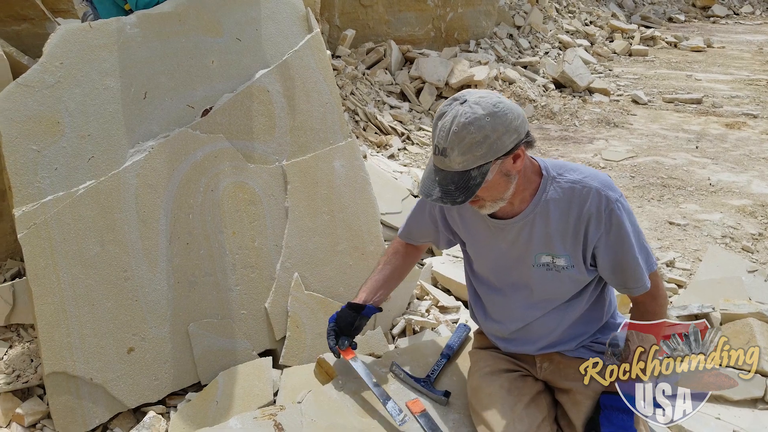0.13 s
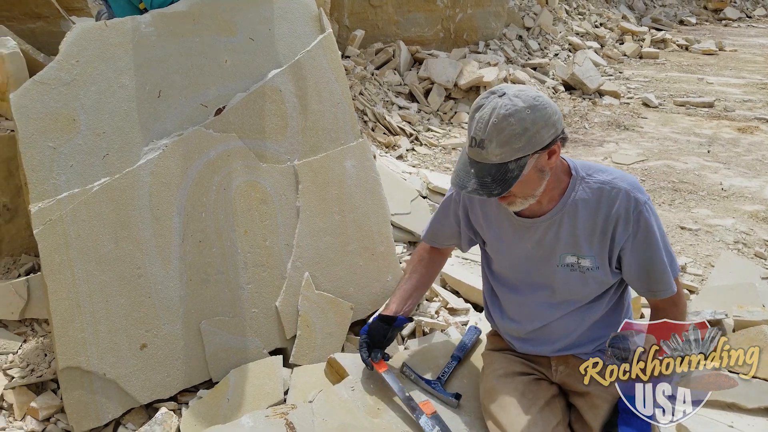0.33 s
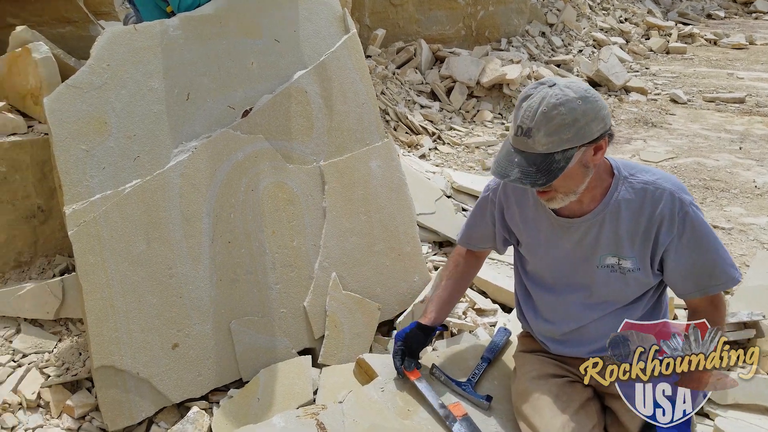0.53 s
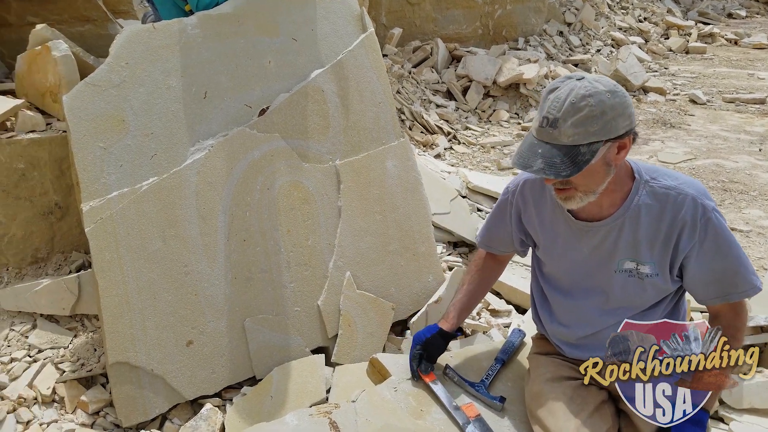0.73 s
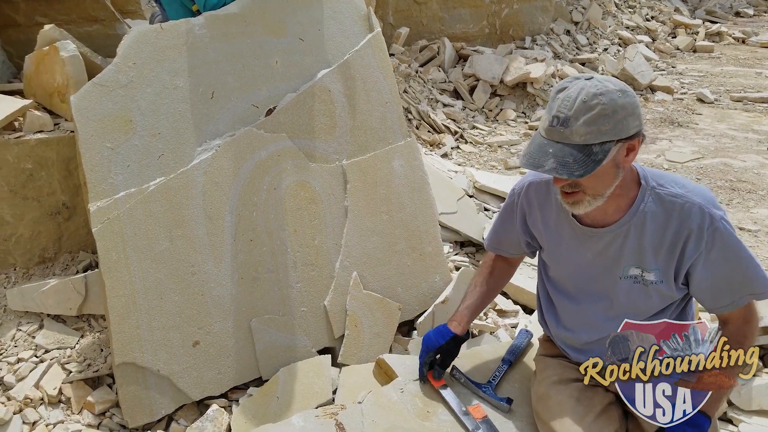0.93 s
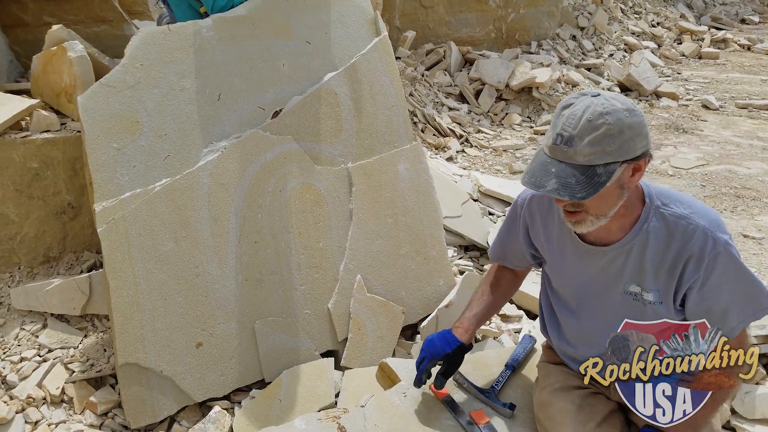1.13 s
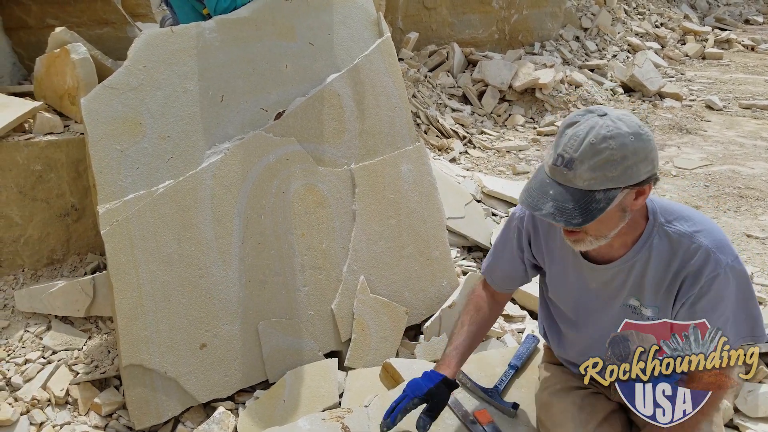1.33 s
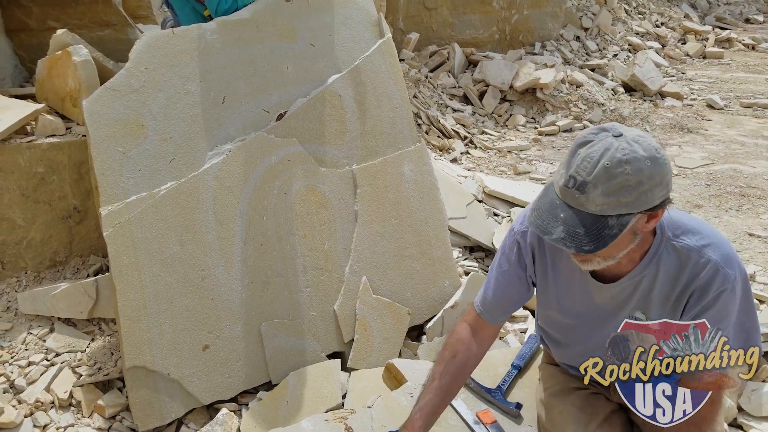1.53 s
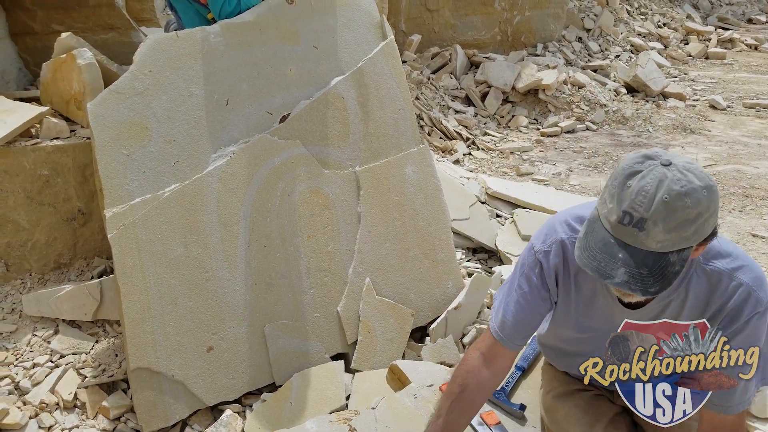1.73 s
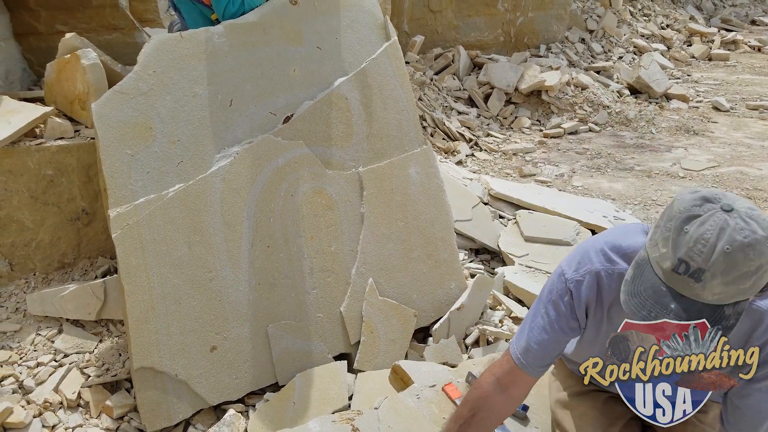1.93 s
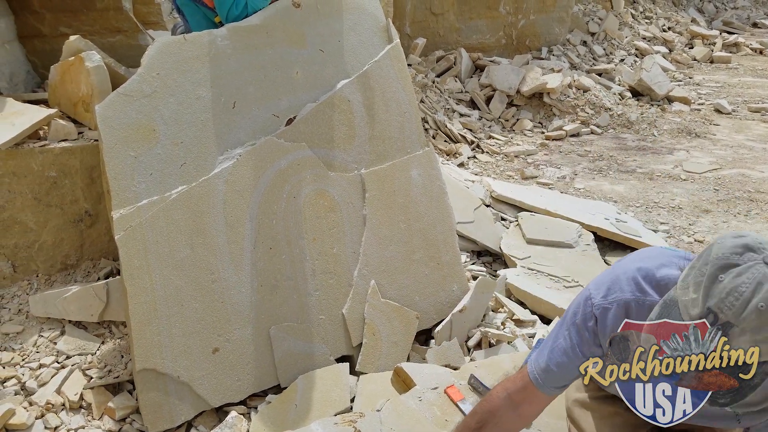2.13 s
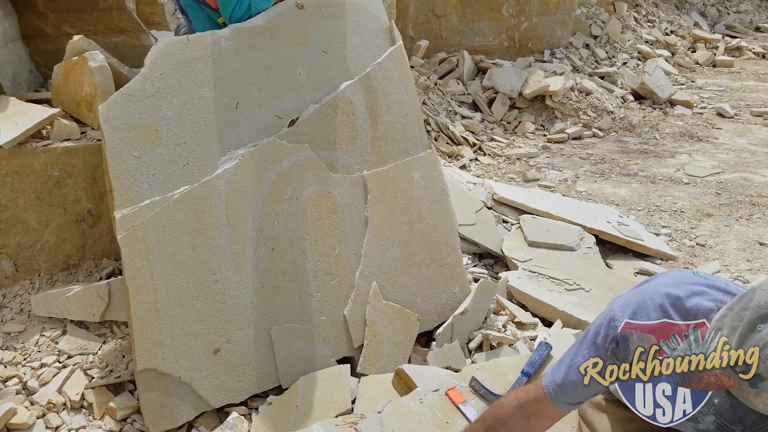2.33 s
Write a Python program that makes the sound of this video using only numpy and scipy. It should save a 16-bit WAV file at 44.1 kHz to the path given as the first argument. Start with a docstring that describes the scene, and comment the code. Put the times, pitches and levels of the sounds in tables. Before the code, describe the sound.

A steel blade taps stone in a quick bright cluster at 0.4 s with a grit scuff, creaks in fine ticks from 0.5 to 0.7, drags with a faint hiss from 0.8, and drops flat, chattering around 1.0 with a short rubble echo. Clothes rustle softly, clearest 1.4-2.0; grit scuffs at 2.3. Low wind thumps, flutters and pops on the microphone over a faint distant drone.

```python
"""Wind buffets each microphone port in turn throughout, with pops and flutter, over a faint far-off drone.
A steel blade's tip clinks on stone slabs in an open quarry (decaying modes) and grit scuffs (noise bursts).
The blade creaks in stick-slip ticks, its tip drags with a hiss, then it drops flat and chatters.
Clothes rustle as the worker leans over, most clearly afterwards (swells of banded noise), and grit scuffs
again near the end. Rubble returns a short diffuse echo of the blade."""
import sys
import numpy as np
from scipy import signal
from scipy.fft import rfft, irfft, next_fast_len
from scipy.io import wavfile
from scipy.ndimage import uniform_filter1d, map_coordinates

SR = 44100
rng = np.random.default_rng(int(sys.argv[2]) if len(sys.argv) > 2 else 0)


def transcribe(u):
    """Save the signal u as a 16-bit wav file named by the first command-line argument.

    u: samples, shape (n,) or (channels, n), limited to [-1, 1]; the rate is SR.
    q: integer samples, one column per channel.
    """
    v = np.clip(np.atleast_2d(u).T, -1, 1)
    q = np.round(v * 32767).astype(np.int16)
    wavfile.write(sys.argv[1], SR, q)


N = 105178  # length in samples

# the blade's modes: (frequency [Hz], level struck at the tip [dB], level landing flat [dB], t60 [s])
BLADE = [(2108, -21, -3, .11), (2192, -18, -4, .15), (2423, -19, 1, .1), (2525, -19, 2, .1),
         (2591, -18, -3, .09), (3419, 1, -1, .1), (3530, -9, -8, .08), (4060, -5, -6, .13),
         (5057, -7, 2, .1), (5097, 3, -8, .11), (5241, -5, -4, .06), (5935, -4, -4, .1),
         (6264, -15, -3, .11), (7020, -3, -3, .09), (7190, -1, -15, .08), (8166, -8, -17, .11),
         (8866, 2, -6, .08), (9271, -15, -12, .1), (11000, -4, -11, .08), (11740, -17, -11, .11),
         (12565, -9, -21, .06), (13500, -10, -15, .07)]
# colour of steel cracking or grating on stone: (frequency [Hz], level [dB])
CRACK = [(300, 2), (1000, -8.5), (1450, -11), (2500, 0.5), (3600, 3), (5400, 6.5), (7300, 6.5), (9800, -8),
         (13500, -5), (16000, -14)]
ATTACK_S = .0005  # time constant of every sudden start


def amp(db):
    """Decibels to gain."""
    return 10 ** (np.asarray(db) / 20)


def unit(x):
    """Scale to rms 1."""
    return x / np.sqrt(np.mean(x ** 2) + 1e-20)


def along(points, hz):
    """Read (frequency, value) points on a log frequency axis."""
    f, v = np.transpose(points)
    return np.interp(np.log(hz + 1), np.log(f + 1), v)


def curves(rows):
    """One value per sample for each column after the time."""
    s, *cols = np.transpose(rows)
    t = np.arange(N) / SR
    return [np.interp(t, s, c) for c in cols]


def wobble(rate):
    """A smooth random curve with rate knots a second."""
    knots = rng.standard_normal(int(N * rate / SR) + 4)
    return map_coordinates(knots, [np.arange(N) * rate / SR])


def filtered(x, response):
    """Shape x in the spectrum by a response of frequency."""
    m = next_fast_len(N + SR // 4)
    spectrum = rfft(x, m) * response(np.fft.rfftfreq(m, 1 / SR))
    return irfft(spectrum, m)[..., :N]


def noise(colour, alike=0):
    """Coloured stereo noise of rms 1; alike is the correlation of its sides."""
    a, b = filtered(rng.standard_normal((2, N)), lambda hz: amp(along(colour, hz)))
    u = np.arccos(np.clip(alike, -1, 1)) / 2
    left = np.cos(u) * a + np.sin(u) * b
    right = np.cos(u) * a - np.sin(u) * b
    return unit(np.array([left, right]))


def swell(s, rise, fall):
    """A bell-shaped envelope peaking at s, with its own width on each side."""
    t = np.arange(N) / SR - s
    return np.exp(-.5 * (t / np.where(t < 0, rise, fall)) ** 2)


def burst(s, t60):
    """A sudden start at s and an exponential decay."""
    t = np.maximum(np.arange(N) / SR - s, 0)
    return (1 - np.exp(-t / ATTACK_S)) * np.exp(-np.log(1000) * t / t60)


def panned(db):
    """Left and right gains of constant power, db being left minus right."""
    g = amp(np.array([np.atleast_1d(db), -np.atleast_1d(db)]) / 2)
    return g / np.sqrt(np.mean(g ** 2, axis=0))


def add(out, s, sound):
    """Mix a short sound in at time s."""
    part = out[..., int(s * SR):][..., :sound.shape[-1]]
    part += sound[..., :part.shape[-1]]


def shares(db):
    """Gains of a set of modes, scaled to a total energy of 1."""
    return amp(db) / np.linalg.norm(amp(db))


def clinks():
    """Every contact adds energy to the blade's strong and lesser modes, cracks, and knocks the slab."""
    # steel meets stone: (time [s], ring level [dB], flatness [0 tip - 1 flat])
    contacts = [(0.4012, -27.5, 0.6), (.411, -17, 0), (.4185, -21.5, 0), (.429, -27, 0.14),
                (.8897, -41.5, 0), (.9321, -38, 0), (.9661, -27, 0.53), (.9985, -20, 0.81),
                (1.013, -19, 0.84), (1.0175, -19, 0.99), (1.026, -30, 1), (1.037, -29, 1),
                (1.047, -30.5, 0), (1.054, -39, 0.71)]
    # the slab's dull modes: (frequency [Hz], level [dB], t60 [s])
    slab = [(426, -2.5, 0.056), (1443, 0, 0.039), (1766, -2.5, 0.063)]
    slab_db = -16  # relative to the blade's ring
    weak_db, weak_t60_s = -5, .07  # lesser modes, relative to the strong ones
    flat_soft_db, flat_dull_db_per_khz = -6, 1.0  # softening by flatness; treble loss of lesser modes
    crack_db, crack_t60_s = 0, .02
    port_phase_rad = .7  # random phase spread of the modes at each port

    hz, tip, flat, t60 = np.transpose(BLADE)
    weak_hz = np.linspace(1300, 15000, num=70) * (1 + .008 * rng.standard_normal(size=70))
    all_hz = np.r_[hz, weak_hz]
    all_t60 = np.r_[t60, np.full(len(weak_hz), weak_t60_s)]
    poles = 2j * np.pi * all_hz - np.log(1000) / all_t60

    t = np.arange(SR // 3) / SR
    attack = 1 - np.exp(-t / ATTACK_S)
    modes = np.exp(poles[:, None] * t) * attack
    knock = attack * sum(amp(db + slab_db) * np.sin(2 * np.pi * f * t) * np.exp(-np.log(1000) * t / life)
                         for f, db, life in slab)
    ports = np.exp(1j * port_phase_rad * rng.standard_normal((2, len(poles))))

    out, cracks, last_s = np.zeros((2, N)), np.zeros(N), 0
    motion = np.exp(2j * np.pi * rng.random(len(poles))) * 1e-9  # almost at rest
    for s, ring_db, flatness in contacts:
        soft_db = flatness * flat_soft_db
        strong = shares(tip + np.clip(flatness, 0, 1) * (flat - tip))
        weak_colour_db = along(CRACK, weak_hz) - flatness * flat_dull_db_per_khz * weak_hz / 10 ** 3
        weak = amp(weak_db + soft_db) * shares(weak_colour_db)
        # kick a quarter turn off the motion still ringing, so that energies add
        motion = motion * np.exp(poles * (int(s * SR) - int(last_s * SR)) / SR)
        quarter_turn = np.exp(1j * np.angle(motion)) * rng.choice([1j, -1j], size=len(poles))
        kick = amp(ring_db) * np.sqrt(2) * np.r_[strong, weak] * quarter_turn
        motion, last_s = motion + kick, s
        ring = ((kick * ports) @ modes).real
        add(out, s, ring + amp(ring_db + soft_db) * knock)
        cracks += amp(ring_db + crack_db + soft_db) * burst(s, crack_t60_s)
    return out + cracks * noise(CRACK, alike=0.46)


def slide():
    """The dragged tip hisses and keeps the blade faintly singing: noise through the modes' resonances."""
    # how strongly the tip drags: (time [s], level [dB])
    drag = [(.68, -110), (.76, -79), (.82, -58.5), (.88, -55), (.95, -48), (.99, -52), (1.04, -110)]
    grit_db = -8  # grating, relative to the singing

    def steel(f):
        """Sharp resonances at the blade's modes."""
        return sum(amp(tip) / (1 + 1j * (f - hz) / (hz * 0.011)) for hz, tip, flat, t60 in BLADE)

    singing = unit(filtered(rng.standard_normal((2, N)), steel))
    level = amp(curves(drag)[0] + 0.68 * wobble(120))
    return level * (singing + amp(grit_db) * noise(CRACK))


def creaks():
    """The held blade sticks and slips in trains of ticks, each ringing briefly at one pitch."""
    # trains: (start [s], length [s], slip rate [1/s], first level [dB], last level [dB], pitch [Hz])
    trains = [(0.5, .022, 48, -31, -37, 5370), (.551, 0.041, 210, -38.5, -28, 4050),
              (.587, 0.0348, 200, -26, -32, 3780), (0.647, .074, 56, -34.5, -35.5, 3060)]
    # colour of a slip: (multiple of its pitch [ratio], level [dB])
    slip_colour = [(.5, -40), (.8, -14), (1, 5.5), (1.2, -8), (1.5, -0.5), (2.1, -4.5), (2.6, -22),
                   (4, -21)]
    slip_t60_s, ring_t60_s, ring_db = 0.0077, .016, -4  # ring level is relative to the grit
    jitter = .05  # timing scatter, in slip periods
    pan_db = 3.5  # left minus right
    out, t = np.zeros((2, N)), np.arange(N) / SR
    for start, length, rate, first_db, last_db, hz in trains:
        grit = noise([(multiple * hz, db) for multiple, db in slip_colour], alike=0.23)
        for age in np.arange(0, length, 1 / rate):
            s = start + age + jitter * rng.standard_normal() / rate
            ring = amp(ring_db) * burst(s, ring_t60_s) * np.sin(2 * np.pi * hz * (t - s))
            level_db = first_db + (last_db - first_db) * age / length
            out += amp(level_db) * (burst(s, slip_t60_s) * grit + ring)
    return out * panned(pan_db)


def rocks(x):
    """The rubble's short diffuse echo: x convolved with noise that decays at its own rate in each band."""
    # echo decay: (frequency [Hz], t60 [s])
    decay = [(500, 0.15), (2200, 0.24), (6000, 0.15), (14000, 0.13)]
    hz, t, z = signal.stft(rng.standard_normal((2, SR // 2)), SR, nperseg=256)
    fading = np.exp(-np.log(1000) * t / along(decay, hz)[:, None])
    tail = signal.istft(z * fading, SR, nperseg=256)[1]
    return signal.fftconvolve(x, tail / np.linalg.norm(tail[0]), axes=1)[:, :N]


def scuffs():
    """Grit scraped on the slab: short decaying bursts of noise with a rough level."""
    # scrapes: (time [s], level [dB], t60 [s])
    scrapes = [(0.43, -29, 0.1), (2.3199, -37.5, 0.073), (2.333, -46, 0.22)]
    # their colour: (frequency [Hz], level [dB])
    scrape_colour = [(400, -24), (1200, -2), (4000, 0.5), (7300, 6), (9800, -17.5), (13000, -7.5),
                     (16000, -2)]
    envelope = sum(amp(db) * burst(s, t60) for s, db, t60 in scrapes)
    return envelope * amp(0.78 * wobble(300)) * noise(scrape_colour, alike=0.15)


def cloth():
    """Sleeve and trousers rub: grainy swells of banded noise under a fine top hiss."""
    # swishes: (peak time [s], rise [s], fall [s], level [dB], centre [Hz], width [octaves])
    swishes = [(.48, 0.062, .04, -56, 5470, 0.99), (.68, 0.1, 0.083, -57, 3750, 0.76),
               (1.409, 0.038, 0.033, -49, 5780, 0.29), (1.69, 0.022, 0.072, -55, 7000, .35),
               (1.796, .04, 0.1, -43.5, 4960, 0.59), (1.869, 0.17, 0.084, -52, 830, 1),
               (1.97, 0.041, 0.039, -48, 5540, 0.63), (2.18, 0.15, 0.12, -53, 5140, 1),
               (2.375, 0.051, 0.061, -41.5, 710, 0.44)]
    # colour shared by all swishes: (frequency [Hz], level [dB])
    swish_colour = [(500, 4.5), (6000, -2), (7800, 2.5), (9300, -5.5), (11500, -6.5), (16000, 6)]
    # top hiss: (time [s], level [dB])
    fizz = [(0, -67), (.38, -64.5), (.47, -51), (.55, -55.5), (.75, -59), (.9, -49.5), (1.15, -59.5),
            (1.32, -65), (1.41, -52), (1.55, -62), (1.74, -47.5), (1.9, -44.5), (2.05, -53.5), (2.38, -64)]
    # its colour: (frequency [Hz], level [dB])
    fizz_colour = [(1000, -20), (3000, -18.5), (7000, -5), (9300, -15.5), (11500, -1.5), (15500, -4.5)]
    out = amp(curves(fizz)[0]) * noise(fizz_colour)
    for s, rise, fall, db, hz, octaves in swishes:
        def weave(f):
            """The shared colour narrowed to a band around the swish's centre."""
            return amp(along(swish_colour, f)) / (1 + (np.log2((f + 1) / hz) / octaves) ** 2)

        band = unit(filtered(rng.standard_normal((2, N)), weave))
        out += amp(db + 1.1 * wobble(180)) * swell(s, rise, fall) * band
    return out


def wind():
    """Eddies thump each port separately as low noise; the strongest gusts flutter higher up."""
    # buffeting: (time [s], level before a 3 dB lift [dB], left minus right [dB])
    buffeting = [(0.0, -44, 4), (0.18, -46.5, 27), (0.24, -56.5, 25), (0.31, -33.5, 52), (0.39, -24, -9.5),
                 (0.45, -43, 15), (0.48, -23.5, 54), (0.53, -15, 8), (0.62, -26.5, 54), (0.66, -21.5, 13),
                 (0.7, -23.5, 44), (0.74, -46, 58), (0.79, -16, -1.0), (0.89, -34, 7), (0.97, -27.5, -4.5),
                 (1.0, -20, -49), (1.03, -20, -8), (1.08, -35, -15), (1.1, -22, -7.5), (1.19, -22, 9),
                 (1.21, -31.5, 24), (1.28, -26.5, 4), (1.35, -27.5, -2.5), (1.38, -32, 27),
                 (1.45, -37.5, 43), (1.47, -30, 22), (1.52, -42.5, 1), (1.58, -14, 4), (1.75, -41.5, -36),
                 (1.83, -41, -1), (1.91, -49.5, -33), (2.01, -41.5, -11.5), (2.07, -18, -2.0),
                 (2.13, -24.5, 0), (2.15, -25.5, -22), (2.19, -23, 13), (2.25, -21, -46), (2.29, -17.5, -6),
                 (2.33, -19, -48), (2.38, -17.5, -37)]
    # its colour: (frequency [Hz], level [dB])
    buffet_colour = [(15, -32), (30, -8), (55, -1.5), (85, 2), (125, -6.5), (200, -17.5), (300, -26),
                     (500, -59), (900, -83.5)]
    # fluttering gusts: (peak time [s], rise [s], fall [s], level [dB], left minus right [dB])
    strong_gusts = [(0.519, 0.033, 0.039, -26.5, -7), (0.602, 0.0083, 0.064, -30, -3),
                    (0.802, 0.011, 0.021, -38.5, 0), (1.006, 0.017, 0.023, -29.5, 8.5),
                    (1.15, 0.026, 0.06, -58.5, -14), (1.275, 0.0088, 0.009, -39.5, -6.5),
                    (1.578, 0.026, 0.014, -42, -1.5), (2.252, 0.099, .05, -35.5, -2),
                    (2.36, 0.038, 0.052, -24, 15)]
    # their colour: (frequency [Hz], level [dB])
    flutter_colour = [(80, -20), (180, -3.5), (330, 5), (480, -2), (700, -21.5), (1100, -29), (2000, -43.5),
                      (4000, -53)]
    level_db, side_db = curves(buffeting)
    eddies = noise(buffet_colour)
    # even out the noise's own swells over 50 ms, so that the table sets the level
    power = np.abs(uniform_filter1d(eddies ** 2, size=2200, axis=1))
    eddies = unit(eddies / np.sqrt(power + 0.025))
    buffet = amp(level_db + 3.0) * panned(side_db) * eddies
    gusts = sum(amp(db) * panned(pan_db) * swell(s, rise, fall)
                for s, rise, fall, db, pan_db in strong_gusts)
    flicker = amp(5.64 * np.array([wobble(110), wobble(110)]))
    return buffet + gusts * unit(noise(flutter_colour) * flicker)


def pops():
    """Sharp single eddies give a port a short damped push: a quickly decaying sine."""
    # pushes: (time [s], level before the decay [dB], pitch [Hz], left minus right [dB])
    pushes = [(.511, -14.5, 300, 10), (.556, -13.5, 247, -13), (0.593, -15, 300, -20), (1.274, -29, 280, 0),
              (1.33, -11, 65, -4), (2.289, -6, 133, 3), (2.329, -15, 302, 2), (2.354, -11, 323, 10)]
    t60_s = .018
    t = np.arange(N) / SR
    return sum(amp(db) * panned(pan_db) * burst(s, t60_s) * np.sin(2 * np.pi * hz * (t - s))
               for s, db, hz, pan_db in pushes)


def drone():
    """A faint far-off drone: steady noise peaking near 330 Hz."""
    # its colour: (frequency [Hz], level [dB])
    drone_colour = [(60, -31), (200, -16), (280, -5.5), (330, 7.5), (380, -6.5), (440, -3.5), (550, -18),
                    (800, -28.5), (2000, -27.5), (5000, -38.5), (8500, -79), (16000, -26)]
    return amp(-49) * noise(drone_colour, alike=0.17)


def scene():
    """The blade to the right with its echo, the worker, the wind and the far drone."""
    left_lag_s = .000095  # the blade's sound reaches the left port later
    echo_db = -12
    side = np.array([[-1], [1]])  # half the lag is a delay on the left, half an advance on the right
    blade = filtered(clinks() + slide() + creaks(), lambda hz: np.exp(1j * np.pi * hz * left_lag_s * side))
    stone = blade + amp(echo_db) * rocks(blade) + scuffs()
    return stone + cloth() + wind() + pops() + drone()


def record(dry):
    """Fade the last 120 samples and cut steeply above the band limit."""
    top_hz = 16000
    fade = np.clip((N - np.arange(N)) / 120, 0, 1)
    return filtered(dry * fade, lambda hz: 1 / (1 + (hz / top_hz) ** 120))


dry = scene()
out = record(dry)
transcribe(out)
```